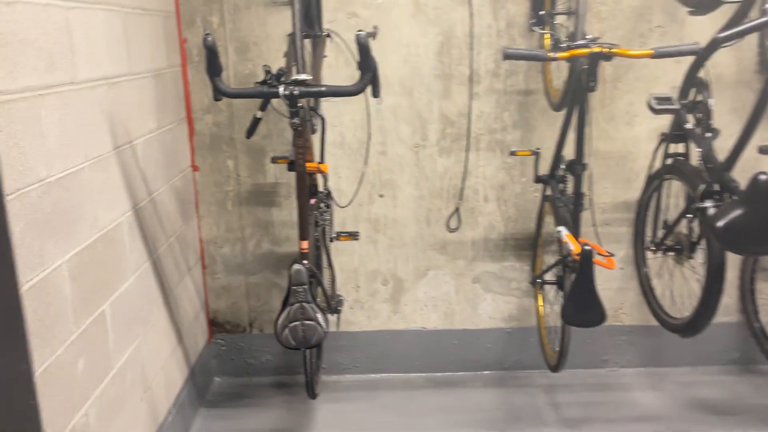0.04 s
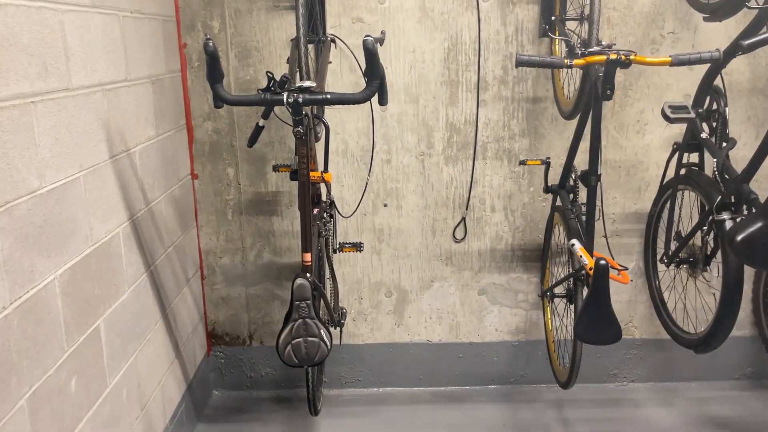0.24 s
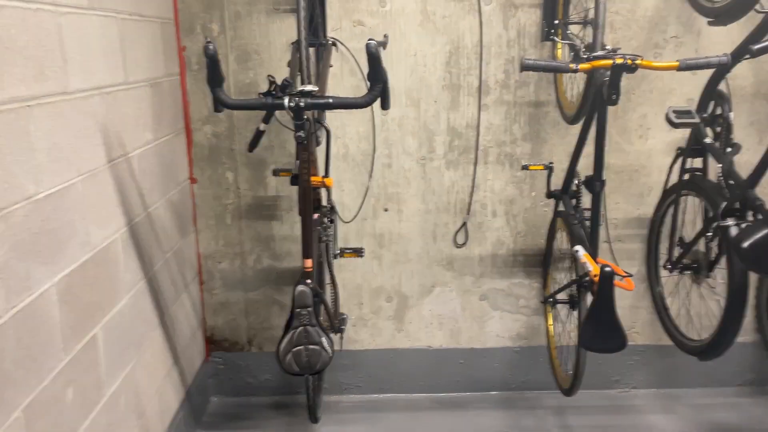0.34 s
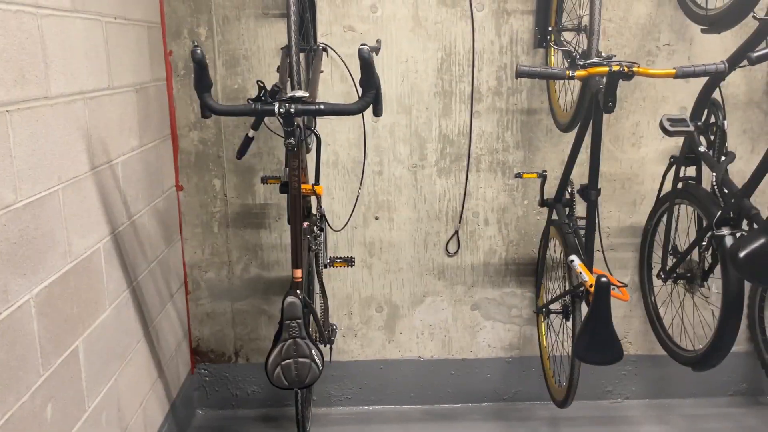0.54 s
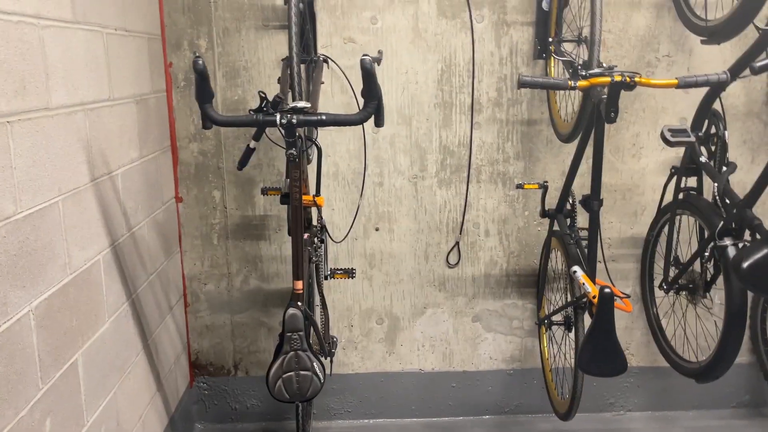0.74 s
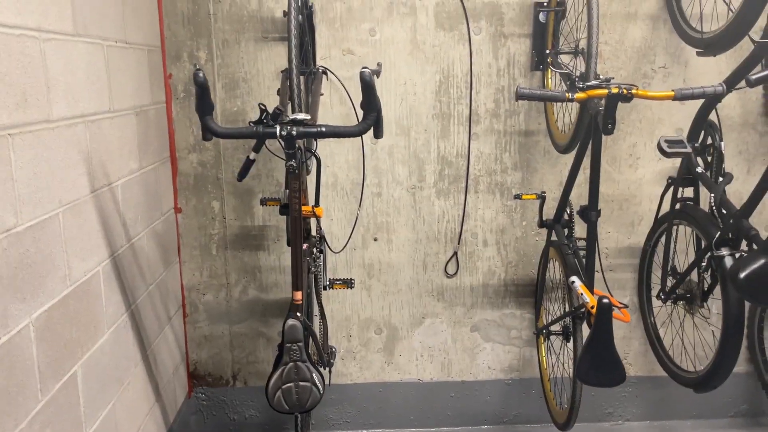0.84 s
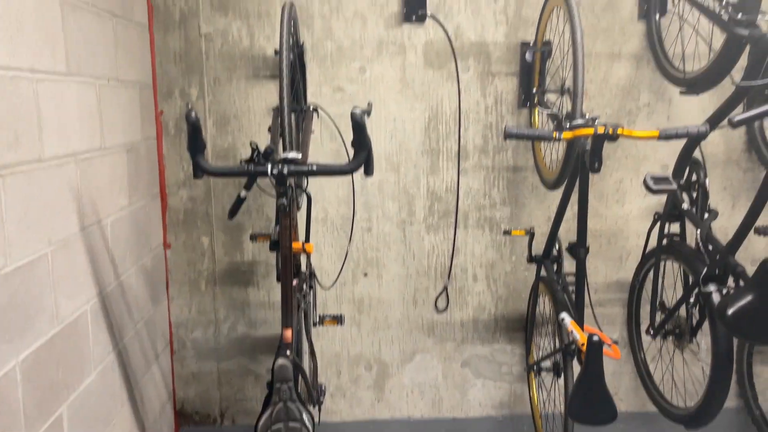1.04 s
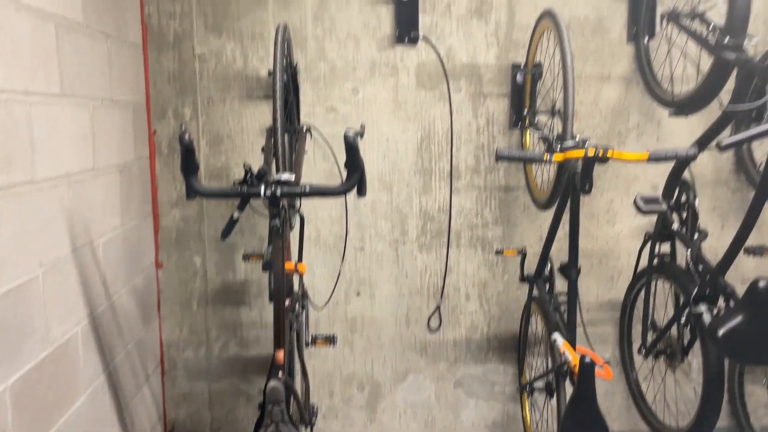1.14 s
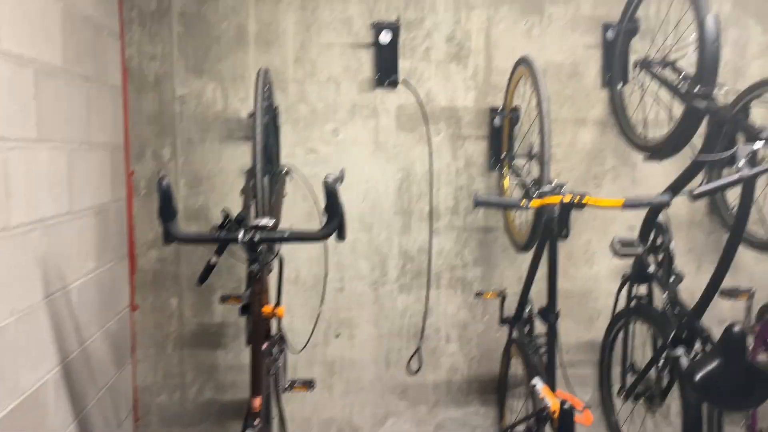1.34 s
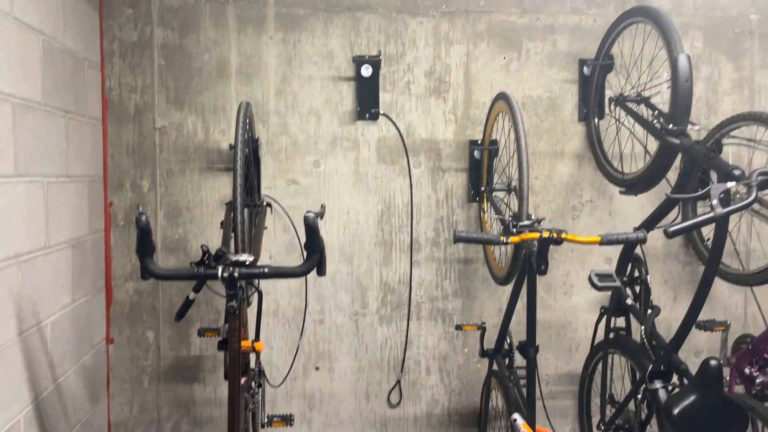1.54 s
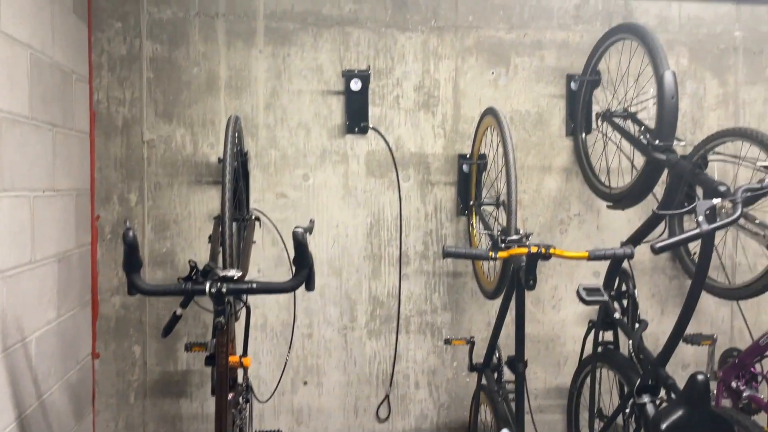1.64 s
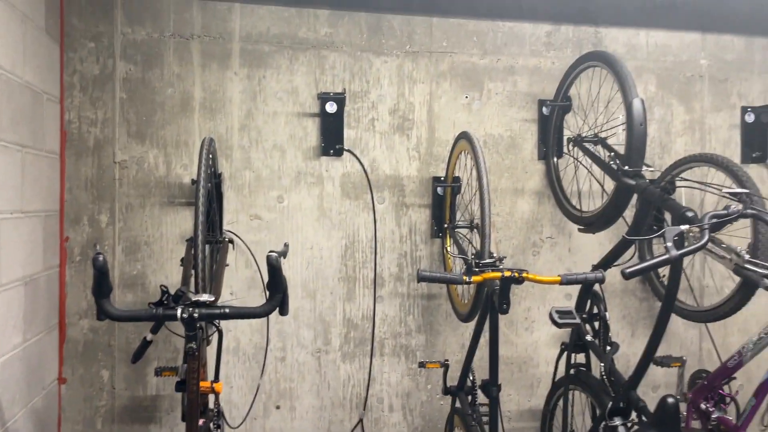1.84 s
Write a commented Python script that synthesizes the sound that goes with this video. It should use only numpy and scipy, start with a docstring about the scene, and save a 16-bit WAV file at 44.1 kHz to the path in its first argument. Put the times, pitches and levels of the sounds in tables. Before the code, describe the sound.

One low door thud echoes indoors, followed by faint shoe scuffs over ventilation hum.

```python
"""A heavy door bumps once, dully, in a bare concrete bike store and the low modes of the room boom on.
A shoe scuffs the floor and clothing brushes softly; ventilation rumbles and hums with a faint high whine."""
import sys
import numpy as np
from scipy import signal
from scipy.fft import rfft, irfft
from scipy.io import wavfile

SR = 44100
rng = np.random.default_rng(int(sys.argv[2]) if len(sys.argv) > 2 else 0)


def pcm_store(signal):
    """Save signal as 16-bit PCM."""
    levels = np.round(np.clip(np.atleast_2d(signal), -1, 1) * 32767)
    wavfile.write(sys.argv[1], SR, levels.astype(np.int16).T)


N = 83790

BUMP_S, PRE_TOUCH_S, PRE_TOUCH_DB = .232, .2115, -47   # the blow, and a soft touch just before it
BOOM_LAG_S, BOOM_RISE_S, BOOM_DB = 0.01277, 0.0062, 0.1   # the heavy panel sets the bass going a little later
# low modes of door and room: (Hz, dB, t60 s)
BOOM_MODES = [(65.9, -35.7, 1.48), (75.8, -36.2, 1.7), (80.3, -27.1, .51), (88.6, -24.3, .3), (117.3, -24.2, .36), (126.8, -40.7, 1.12), (131.6, -39.1, 1.55), (140.3, -30.6, .57), (149.3, -40.6, 1.38), (160, -45.7, 1.28), (225.7, -50, 1.07), (238.9, -47.3, 2.0)]   # fixed
# short knock of the door leaf: (Hz, dB, t60 s)
KNOCK_MODES = [(142, -37, 0.091), (225, -37, 0.12), (304.2, -50, 0.8), (354, -44.5, 0.069), (558, -50.5, 0.36), (722, -56.5, 1), (1030, -50, 0.39), (1077, -39, 0.052), (1178, -58, 0.42), (1286, -59.5, 0.17), (1583, -62, 0.45)]
# the blow scattered by the walls: (Hz, dB per Hz)
SLAP = [(170, 8), (230, -4.5), (350, -2), (550, -10), (850, -10.5), (1100, -6.5), (1450, -18.5), (2200, -24.5), (5000, -33.5), (10000, -33), (13000, -43), (16000, -38)]
SLAP_DB, SLAP_RISE_S, CRACK_DB, CRACK_S = -44, 0.0065, -59, 0.0042
# reverberation of the room: (Hz, t60 s)
ROOM_T60 = [(100, 3.6), (400, 0.63), (1100, 0.88), (3000, 0.57), (7000, 0.53), (14000, 0.28)]
# shoe scuffs, each with its own brightness: (s, level dB, attack s, hold s, release s, treble edge Hz)
SCUFFS = [(.36, -70, 0.0043, 0.072, 0.047, 6440), (.459, -58, 0.019, 0.0063, 0.019, 10900), (.51, -57, 0.0028, 0.0061, 0.015, 11500), (.535, -66.5, 0.006, 0.015, 0.028, 12500), (.57, -69.5, .012, 0.048, 0.0079, 5900), (.85, -71, .008, 0.0082, .014, 7500), (.955, -69, 0.013, 0.021, .01, 2130)]
SCUFF_COLOUR = [(1000, 1), (1600, 1.5), (2500, -8), (3400, -1), (4400, -5), (5200, -5), (6800, -10), (10500, -14), (15500, -7.5)]   # (Hz, dB per Hz)
# thin brushes of clothing: (s, level dB, attack s, hold s, release s, treble edge Hz)
BRUSHES = [(.082, -68.5, 0.0066, 0.0056, 0.018, 18200), (.097, -65.5, 0.012, 0.0051, 0.021, 17700), (.268, -65, 0.015, 0.018, 0.026, 14000)]
BRUSH_COLOUR = [(1500, -12), (3500, 1), (6000, -5.5), (8500, -4), (9500, -3), (11000, -1), (13000, -12), (15500, 4)]
# dull shuffling movements: (s, level dB, attack s, hold s, release s, treble edge Hz)
SHUFFLES = [(.07, -62, 0.022, 0.014, 0.038, 3000), (.355, -52.5, 0.043, 0.034, .018, 2500), (.81, -63.5, 0.053, 0.045, 0.068, 2000), (1.2, -65, 0.028, 0.28, .06, 2070), (1.695, -58, 0.056, 0.063, 0.098, 1980)]
SHUFFLE_COLOUR = [(150, -3.5), (280, 8.5), (500, -1.5), (800, 0.5), (1150, -2.5), (1500, -15), (2200, -16), (4000, -42.5)]
RUB_ROOM_DB = -6
# a soft rustle dying away at the start
RUSTLE_DB, RUSTLE_FADE_DB_PER_S = -62.5, 22
RUSTLE_COLOUR = [(600, 11), (1300, 2), (2500, -6.5), (4000, -12.5), (7000, -21.5), (12000, -31.5)]
# ventilation: (Hz, dB per Hz), and its steady tones (Hz, dB rms)
VENT = [(36, -20.5), (46, 0.5), (60, 2.5), (90, -3.5), (130, -1.5), (190, -4), (300, -8), (500, -10.5), (750, -13.5), (1100, -16.5), (1600, -25.5), (2100, -30.5), (2800, -40.5), (6000, -46), (10000, -51.5), (15000, -59)]
VENT_DB = -58.5
HUM = [(59.5, -63), (119.7, -59), (240, -66), (640.3, -65)]
# narrow bands of electrical whine: (Hz, width Hz, dB rms)
WHINE = [(3970, 230, -92.5), (7860, 410, -87.5)]
MIC_LOW_HZ = 39   # fixed
CUTOFF_HZ = 15800   # fixed
T = np.arange(N) / SR
# faint squeaks of a sole: (s, level dB, attack s, hold s, release s, treble edge Hz)
SQUEAKS = [(.675, -75, 0.012, 0.022, 0.0075, 5000), (1.188, -77, 0.0073, 0.0099, 0.023, 5050), (1.212, -72, 0.0074, 0.0097, 0.026, 4500)]
SQUEAK_COLOUR = [(1700, -7), (2400, -5), (3200, -18.5), (3850, -4), (4400, -24), (8000, -16)]   # (Hz, dB per Hz)
PRE_TOUCH_MODES = [(405, 5.5, 0.04), (610, -0.5, 0.04)]   # the soft touch: (Hz, dB, t60 s)


def from_db(db):
    """Decibels to gain."""
    return 10 ** (np.asarray(db) / 20)


def rms_one(x):
    """Scale to rms 1."""
    return x / np.sqrt(np.mean(x ** 2) + 1e-20)


def at_hz(points, hz):
    """Read a table on a log-frequency axis."""
    points = np.array(points)
    return np.interp(np.log(hz), np.log(points[:, 0]), points[:, 1])


def noise(colour):
    """Noise of rms 1 with the given spectrum, falling steeply beyond its ends."""
    hz = np.maximum(np.fft.rfftfreq(N, 1 / SR), 1)
    skirts = 1 / np.sqrt((1 + (colour[0][0] / hz) ** 6) * (1 + (hz / colour[-1][0] / 2) ** 6))  # fixed
    return rms_one(irfft(rfft(rng.standard_normal(N)) * from_db(at_hz(colour, hz)) * skirts, N))


def drift(rate):
    """Slow random motion of spread 1."""
    r = np.exp(-2 * np.pi * rate / SR)
    return rms_one(signal.lfilter([1], [1, -2 * r, r * r], rng.standard_normal(N + SR))[SR:])


def since(start):
    """Seconds since a moment, zero before it."""
    return np.maximum(T - start, 0)


def ring(modes, age):
    """Decaying sines of a struck body."""
    return sum(from_db(db - 60 * age / t60) * np.sin(2 * np.pi * hz * age) for hz, db, t60 in modes)


def die_away(x, age):
    """Let each octave of a noise fade at the room's rate."""
    centres = 62.5 * 2.0 ** np.arange(9)  # fixed
    log_hz, spectrum = np.log(np.maximum(np.fft.rfftfreq(N, 1 / SR), 1)), rfft(x)
    return sum(irfft(spectrum * np.interp(log_hz, np.log(centres), share), N) * from_db(-60 * age / at_hz(ROOM_T60, hz))
               for hz, share in zip(centres, np.eye(len(centres))))


def room(x):
    """Diffuse reverberation of the concrete walls."""
    tail = die_away(rng.standard_normal(N), T) * (1 - np.exp(-T / 0.0027))
    return signal.fftconvolve(x, tail / np.sqrt(np.sum(tail ** 2)))[:N]


def door():
    """A soft touch, then the blow: a crack, a short knock, a swelling boom and the wash from the walls."""
    age, boom_age, touch_age = since(BUMP_S), since(BUMP_S + BOOM_LAG_S), since(PRE_TOUCH_S)
    touch = from_db(PRE_TOUCH_DB) * ring(PRE_TOUCH_MODES, touch_age)
    crack = from_db(CRACK_DB) * noise([(1100, -5), (2600, -5), (5000, -29), (15000, -8)]) * (age > 0) * np.exp(-age / CRACK_S)
    boom = from_db(BOOM_DB) * ring(BOOM_MODES, boom_age) * (1 - np.exp(-boom_age / BOOM_RISE_S))
    wash = from_db(SLAP_DB) * die_away(noise(SLAP), age) * (1 - np.exp(-age / SLAP_RISE_S))
    return touch + crack + ring(KNOCK_MODES, age) + boom + wash


def rub(strokes, colour, grain_db, grain_rate):
    """Friction: each stroke swells, holds and lets go, made grainy by tiny catches."""
    friction = rms_one(noise(colour) * from_db(grain_db * drift(grain_rate)))
    out = np.zeros(N)
    for s, db, attack, hold, release, edge_hz in strokes:
        level = from_db(db) * np.clip(since(s) / attack, 0, 1) * np.exp(-since(s + attack + hold) / release)
        out += level * signal.sosfilt(signal.butter(3, min(edge_hz, .45 * SR), fs=SR, output="sos"), friction)
    return out


def movement():
    """Shoes and clothing close by, with their reverberation."""
    dry = (rub(SCUFFS, SCUFF_COLOUR, grain_db=2.5, grain_rate=570)
           + rub(SQUEAKS, SQUEAK_COLOUR, grain_db=3.5, grain_rate=120)
           + rub(BRUSHES, BRUSH_COLOUR, grain_db=1, grain_rate=500)
           + rub(SHUFFLES, SHUFFLE_COLOUR, grain_db=1.5, grain_rate=74))
    rustle = from_db(RUSTLE_DB - RUSTLE_FADE_DB_PER_S * T + 0.4 * drift(40)) * noise(RUSTLE_COLOUR)
    return dry + from_db(RUB_ROOM_DB) * room(dry) + rustle


def ventilation():
    """Air rumble, steady motor tones and a thin whine."""
    hum = sum(from_db(db) * np.sqrt(2) * np.sin(2 * np.pi * (hz * T + rng.random())) for hz, db in HUM)
    whine = sum(from_db(db) * rms_one(signal.sosfilt(signal.butter(2, [hz - width / 2, hz + width / 2], "band", fs=SR, output="sos"), rng.standard_normal(N)))
                for hz, width, db in WHINE)
    return from_db(VENT_DB) * noise(VENT) + hum + whine


def scene():
    """Everything at one microphone."""
    return (door() + movement() + ventilation())[None]


def record(dry):
    """The microphone loses the deepest bass; the top is cut."""
    thinned = signal.sosfilt(signal.butter(4, MIC_LOW_HZ, "high", fs=SR, output="sos"), dry)
    return signal.sosfilt(signal.ellip(10, .1, 80, CUTOFF_HZ, fs=SR, output="sos"), thinned)  # fixed


dry = scene()
out = record(dry)
pcm_store(out)
```